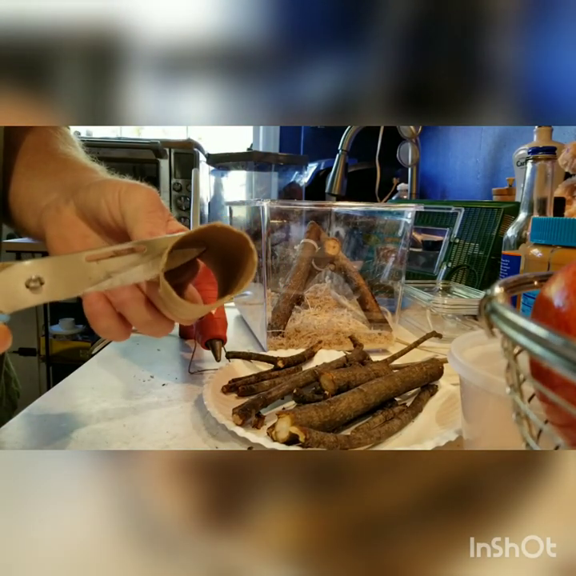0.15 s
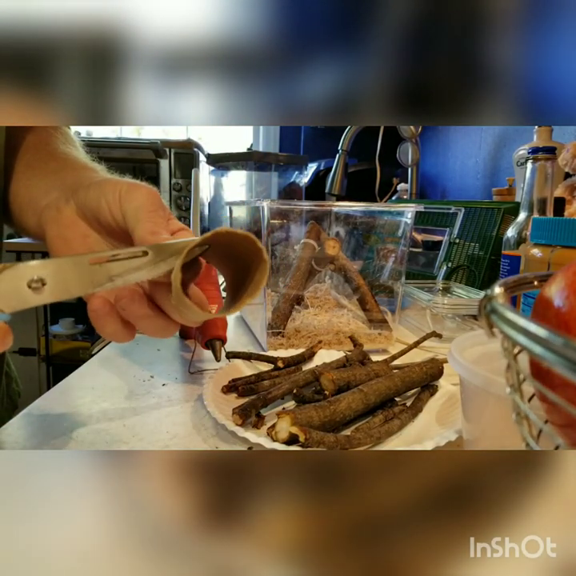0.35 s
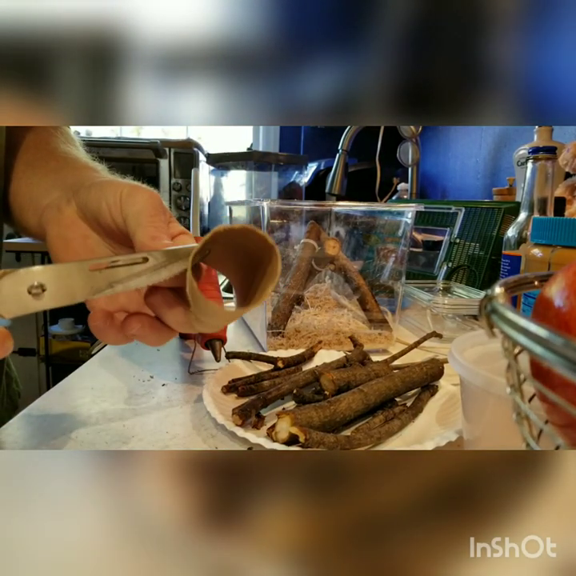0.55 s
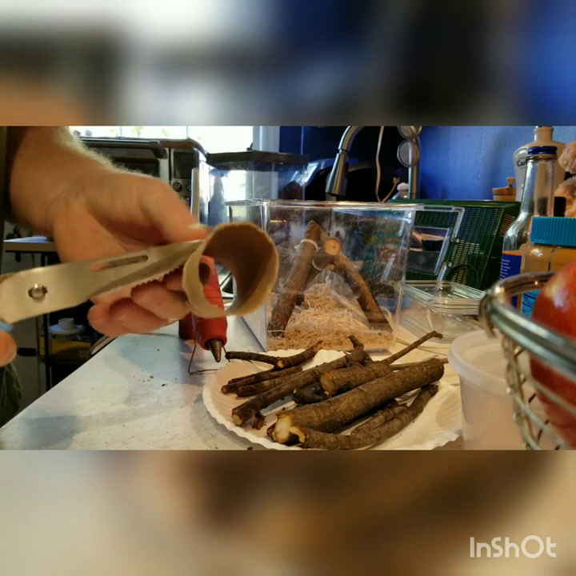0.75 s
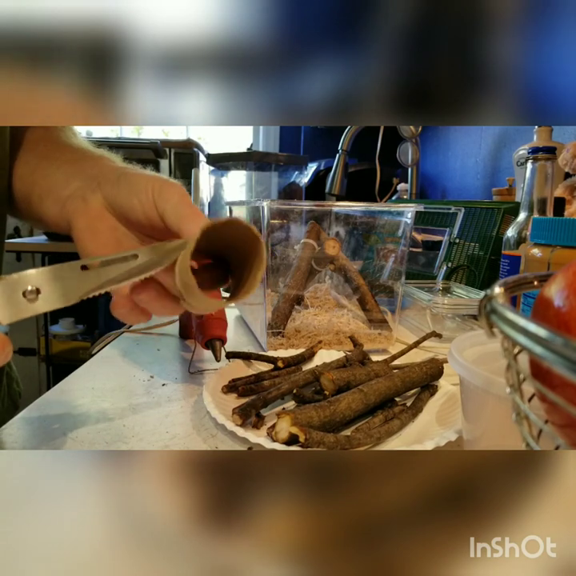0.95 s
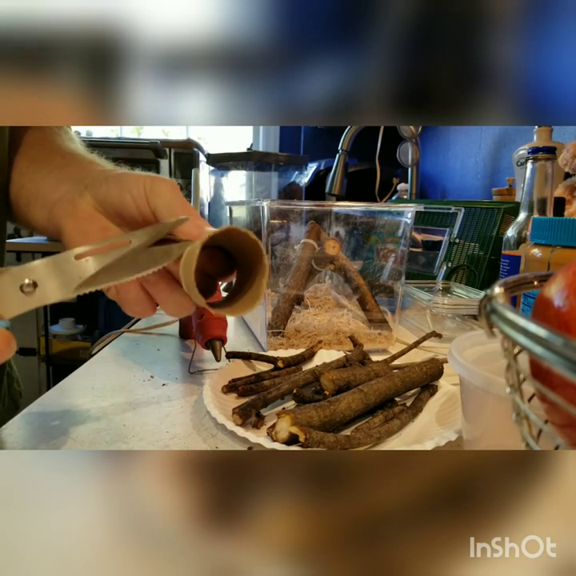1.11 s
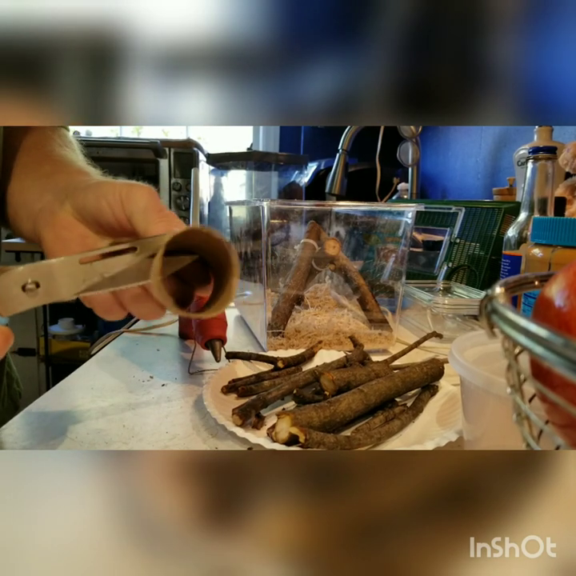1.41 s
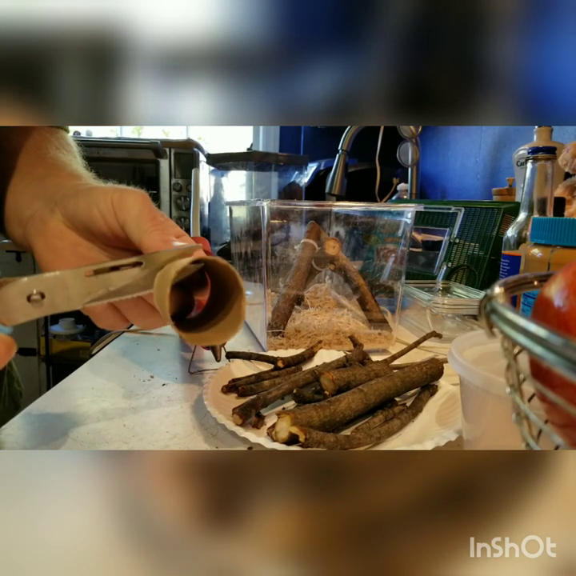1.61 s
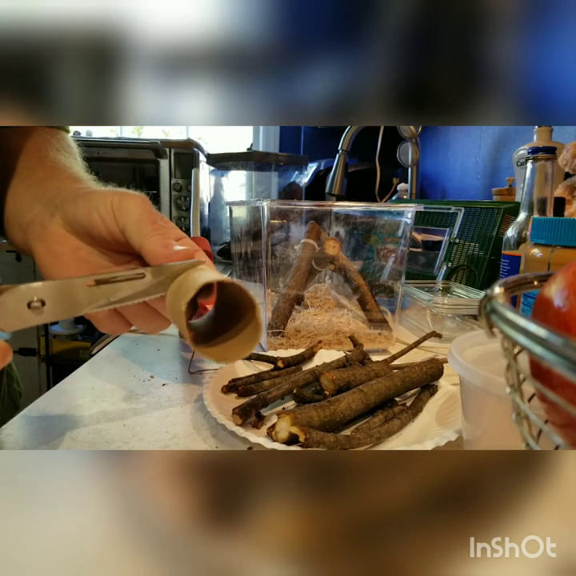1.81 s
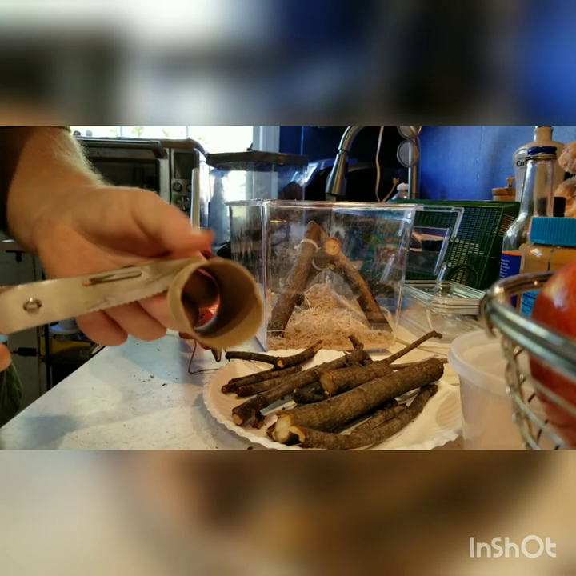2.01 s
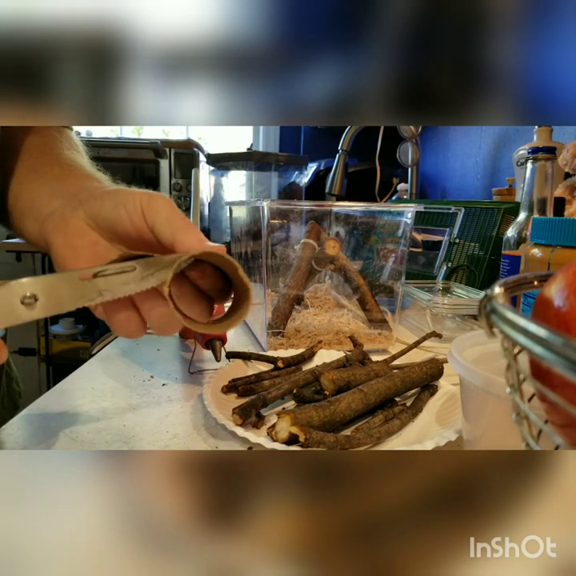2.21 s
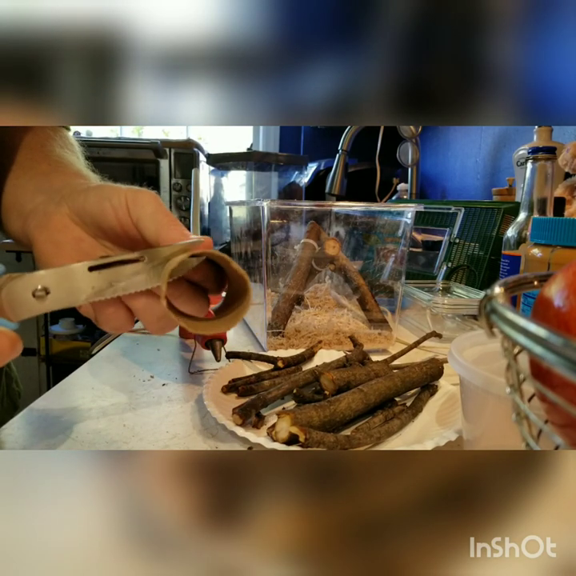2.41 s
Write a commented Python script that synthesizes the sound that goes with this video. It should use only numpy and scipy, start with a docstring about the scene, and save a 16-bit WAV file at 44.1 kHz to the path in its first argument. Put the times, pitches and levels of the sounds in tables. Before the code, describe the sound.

Close scissors cutting a cardboard tube in crisp uneven crunches, with papery scraping and hollow knocks.

```python
"""Kitchen counter: scissors nibble at a short cardboard tube close to two microphones.
Blades and fingers rub the card in strokes of dense fibre grains; fibres give way in short snaps.
Both ring the blades, the tube wall, the air in the tube and its overtones, and the hissing fibres.
Jolts of the hands thud through the counter, and a quiet room hums underneath.
Short random reflections, partly different at the two microphones, spread the scissors' sound."""
import sys
import numpy as np
from scipy import signal
from scipy.fft import rfft, irfft, next_fast_len
from scipy.io import wavfile
from scipy.ndimage import map_coordinates

SR = 44100
rng = np.random.default_rng(int(sys.argv[2]) if len(sys.argv) > 2 else 0)


def put_to_file(sound):
    """Save the sound as 16-bit audio at rate SR, in the file named by the first command-line argument."""
    columns = np.atleast_2d(sound).T  # one column per channel
    safe = np.clip(columns, -1, 1)
    whole_steps = np.round(safe * 32767)
    wavfile.write(sys.argv[1], SR, whole_steps.astype(np.int16))


N = 112454  # samples
CREST_S = 0.0012  # a snap crests this long after its onset


def scissors():
    """Strokes and snaps ring every body; random reflections to the microphones, redrawn and cross-faded."""
    # resonances of each body: f/Hz, width/Hz, level/dB relative within the body
    blade_modes = [(4544, 1270, -6.5), (5540, 535, 1), (6186, 430, -1), (6975, 590, 2), (7600, 760, -0.5)]
    wall_modes = [(339, 48, 0), (492, 47.4, 3.5), (633, 160, -4)]
    wall_high_modes = [(795, 106, -2.5), (984, 105, -1), (1154, 86, -2)]
    air_modes = [(1328, 96, -2.5), (1564, 56, 6), (1750, 92, 2.5), (2110, 430, -3.5)]
    overtone_modes = [(2417, 340, -10.5), (2724, 330, -1.5), (2880, 114, 2)]  # narrow and lower, near 2.7 kHz
    overtone_broad_modes = [(2385, 500, -16), (2994, 500, -1.5), (3490, 510, 1.5), (3984, 800, -1.5)]  # broad and higher
    fibre_modes = [(9650, 1900, -4), (11990, 2340, -0.5), (15150, 2100, 0)]
    # share of the wall's force that drives its higher modes: t/s, share/0-1
    wall_shift = [(0, 0.6), (.25, 0.65), (.33, 0.2), (.45, 0.6), (.6, 0.12), (.66, 1), (.8, 0.47),
                  (.95, 0.08), (1.37, 0.59), (1.46, 0.5), (1.78, 0.7), (1.82, .25), (2.1, 0.6), (2.3, 0.94),
                  (2.55, 0.18)]
    # share of the overtone's force that drives the narrow set: t/s, share/0-1
    narrow_share = [(0, 1), (.245, .95), (.27, 0.56), (.7, 0.38), (1, 0.43), (1.3, 0.6), (1.4, 0.23),
                    (1.75, 0.68), (1.8, 1), (1.82, 0.3), (2, 0.04), (2.55, 0.35)]
    # colour of the reflections that differ between the microphones: f/Hz, gain/dB
    apart_colour = [(60, -10), (110, -8), (200, -7), (380, -5.5), (700, -2.5), (1290, 1.5), (2380, -1.5),
                    (4400, 1), (8120, 1.5), (15000, -0.5)]
    redraw_s = 0.07  # time between fresh draws of the reflections

    blades, wall, air, overtone, fibres = rubbing() + snaps()
    wall_high, wall_low = wall * shares(wall_shift)
    overtone_narrow, overtone_broad = overtone * shares(narrow_share)
    driven = [(blades, blade_modes), (wall_high, wall_high_modes), (wall_low, wall_modes),
              (air, air_modes), (overtone_narrow, overtone_modes),
              (overtone_broad, overtone_broad_modes), (fibres, fibre_modes)]
    rung = sum(filtered(force, body(modes)) for force, modes in driven)

    # cross-fade from one draw to the next, which averages out their colouring
    draw_clock = np.arange(N) / SR / redraw_s
    common, apart = 0, 0
    for k in range(int(draw_clock[-1]) + 2):
        near_draw = np.clip(1 - np.abs(draw_clock - k), 0, 1)
        common_part, apart_part = paths(rung * near_draw)
        common = common + common_part
        apart = apart + apart_part
    apart = filtered(apart, lambda hz: amp(along(apart_colour, hz)))
    return np.array([common + apart, common - apart]) + thuds()


def rubbing():
    """Friction of blade or finger on card: fibre grains that fade in, follow each stroke and fade out."""
    # strokes along the card, one list each: t/s, then force level/dB on
    # blades, tube wall, tube air, tube overtone, fibre hiss
    strokes = [
        [(0.055, -69, -95, -99, -93, -73), (0.095, -68, -97, -99, -74, -68), (0.135, -65, -96, -91, -73, -69),
         (0.145, -70, -95, -95, -81, -74)],
        [(0.15, -60, -91, -88, -65, -61), (0.17, -61, -85, -99, -59, -57), (0.188, -51, -90, -78, -59, -54),
         (0.205, -64, -94, -88, -72, -62)],
        [(0.255, -50, -53, -53, -52, -42), (0.275, -55, -61, -64, -62, -53), (0.297, -41, -60, -53, -41, -36),
         (0.335, -51, -75, -60, -65, -52)],
        [(0.34, -57, -61, -62, -66, -55), (0.382, -41, -63, -48, -50, -45), (0.408, -51.5, -62, -63, -57, -52),
         (0.42, -53, -63, -62, -62, -55)],
        [(0.435, -65, -70, -52, -59, -55), (0.449, -56, -60, -52, -54, -47),
         (0.507, -61.5, -74, -75.5, -80, -58), (0.53, -60, -84, -75, -72, -55)],
        [(0.535, -57, -82, -76, -82, -54), (0.539, -50.5, -85, -75, -76, -54),
         (0.591, -46, -81, -46, -63, -43.5), (0.6, -52, -71, -52, -56, -56)],
        [(0.605, -49, -56, -60, -53, -43), (0.615, -43, -41, -43, -44, -43),
         (0.637, -35.5, -44, -37, -43, -36.5), (0.645, -33.5, -62, -37, -34.5, -34.5)],
        [(0.67, -41, -51, -42, -41, -45), (0.692, -49, -58, -52.5, -48, -51), (0.712, -45, -52, -47, -49, -48),
         (0.725, -52, -72, -67, -50.5, -51)],
        [(0.735, -50, -68, -56.5, -58, -53), (0.773, -53, -77, -64, -59, -53), (0.795, -64, -89, -83, -67, -63),
         (0.815, -63, -85, -78, -77, -58)],
        [(0.82, -58, -83, -73, -86, -57), (0.838, -51.5, -95, -66, -65, -46),
         (0.854, -56.5, -95, -59.5, -63, -51), (0.88, -51, -67, -71, -47, -48)],
        [(0.92, -68, -54, -55, -73, -71), (0.95, -54, -69, -70, -60, -56), (1.006, -50, -81, -58, -53, -52.5),
         (1.04, -59, -94, -66, -59.5, -60)],
        [(1.05, -65, -87, -78, -76, -61), (1.068, -59, -91, -57, -61, -59), (1.076, -62, -90, -60, -63, -61),
         (1.11, -59.5, -76, -77, -68, -58)],
        [(1.14, -53, -61.5, -56.5, -57.5, -63), (1.216, -56, -81, -72, -64, -53),
         (1.242, -51, -73, -64, -56, -52), (1.28, -63, -86, -67, -65, -61)],
        [(1.295, -52, -86, -65, -59, -50), (1.325, -58, -98, -76, -63, -56), (1.347, -47, -52, -53, -52, -47),
         (1.36, -56.5, -66, -62, -60, -56)],
        [(1.378, -42.5, -41.5, -41.5, -44, -43), (1.44, -47.5, -67.5, -46.5, -50, -48),
         (1.458, -56.5, -54, -64, -50, -53), (1.472, -55.5, -66, -55, -55, -55)],
        [(1.48, -58.5, -63.5, -58, -58, -60), (1.606, -62.5, -82, -76, -68.5, -65),
         (1.642, -64, -97, -80, -71, -57.5), (1.69, -75.5, -86, -99, -87, -75)],
        [(1.79, -45, -58, -56, -55, -44), (1.804, -49, -67, -58, -51, -46), (1.808, -39, -48, -53, -54, -41)],
        [(1.835, -44, -47.5, -46, -39.5, -40), (1.883, -57, -75, -75, -67, -67),
         (1.905, -63, -72, -70, -65, -78), (1.915, -57, -61.5, -54, -65, -54)],
        [(1.94, -55, -65, -58, -56, -61), (1.97, -61, -79, -71, -64.5, -54.5),
         (2.064, -51, -74, -60, -51.5, -51), (2.11, -52.5, -70, -64, -56.5, -59)],
        [(2.122, -44, -53.5, -62, -49, -44), (2.166, -42, -69, -50.5, -45, -42.5),
         (2.202, -55.5, -79, -66, -57, -55), (2.25, -52, -85, -69, -56, -52)],
        [(2.264, -44, -65, -46, -42.5, -44), (2.314, -39, -45, -44, -39.5, -39),
         (2.342, -45, -55.5, -43.5, -45, -46.5), (2.385, -54, -65, -61.5, -54, -50.5)],
        [(2.4, -50, -68.5, -55, -51.5, -50.5), (2.454, -48.5, -51.5, -48, -48.5, -47.5),
         (2.49, -54.5, -65, -55.5, -54, -60), (2.53, -64, -77, -74, -76, -66)],
    ]
    rise_s, fall_s = 0.0065, 0.01
    rub_db, flutter_depth_db = -0.19, 0.91  # trim; unevenness of the rubbing
    t, power = np.arange(N) / SR, np.zeros((5, N))
    for stroke in strokes:
        times, *levels = np.transpose(stroke)
        before = np.minimum(t - times[0], 0) / rise_s
        after = np.maximum(t - times[-1], 0) / fall_s
        edges = np.exp(-before ** 2 - after ** 2)
        force = edges * amp([np.interp(t, times, db) for db in levels])
        power += force ** 2
    # one flutter shared by all bodies, one for each alone
    flutter = wobble(60) + np.array([wobble(40) for _ in power])
    return grains(0.5) * amp(rub_db + flutter_depth_db * flutter) * np.sqrt(power)


def snaps():
    """Breaking fibres push each body: crunches burst with grains, ticks start with one sharp slip."""
    # bursts of tearing fibres: t/s, level/dB before trim, then over it level/dB on
    # blades, tube wall, tube air, tube overtone, fibre hiss; rise/s, t60/s
    crunches = [(0.217, -24, -10.5, -54, -38, -12.5, -16, 0.0016, 0.025),
                (0.237, -15.5, -11, -33, -24, -15, -12.5, 0.0043, 0.042),
                (0.296, -20.5, -14, -39, -18.5, -26, -12.5, 0.0096, 0.057),
                (0.368, -28.5, -12.5, -61, -25, -26, -8.5, 0.003, 0.05),
                (0.382, -23, -11.5, -46, -41, -19, -14, 0.0021, 0.021),
                (0.427, -29, -10, -32, -25, -23, -8, 0.0026, 0.057),
                (0.584, -32, -8.5, -29, -7, -28, -8, 0.0022, 0.097),
                (0.612, -28.5, -15, -14, -6, -20, -11, 0.0042, 0.083),
                (0.651, -9.5, -13.5, -14.5, -12, -14.5, -17, 0.0057, 0.039),
                (0.706, -33, -17, -26, -27, -16, -17, 0.00354, 0.043),
                (0.888, -24.5, -10.5, -26, -19, -13.5, -11, 0.0049, 0.055),
                (0.905, -27.5, -17, -20.5, -16.5, -25, -14, 0.0035, 0.056),
                (1.117, -21, -16.5, -36, -21, -17.5, -14, 0.0027, 0.056),
                (1.287, -32, -13.5, -47, -28, -18, -13, 0.0035, 0.036),
                (1.343, -37, -4, -7, -10, -6, -11, 0.0013, 0.017),
                (1.456, -28, -16, -19.5, -11.5, -16.5, -16, 0.0029, 0.043),
                (1.778, -19.5, -9, -24, -23, -10.5, -8.5, 0.0043, 0.035),
                (1.814, -11, -10.5, -19, -19.5, -15.5, -12.5, 0.0023, 0.055),
                (1.923, -21.5, -10.5, -25.5, -21.5, -19, -13.5, 0.0024, 0.051)]
    # single slips: t/s, level/dB before trim, then over it level/dB on the same five bodies
    ticks = [(0.055, -50.5, -9.5, -28, -27, -26.5, -10.5), (0.077, -53, -7, -38, -38, -24, -10.5),
             (0.089, -52, 2, -37, -47, -18, -14), (0.097, -39, -12, -39, -44, -24, -17),
             (0.11, -47.5, -9, -46, -37, -21, -16), (0.127, -41.5, -8, -47, -46, -21, -14),
             (0.465, -33.5, -17, -25, -23, -28, -8), (0.542, -39, -9, -34, -28, -26, -4.5),
             (0.562, -31.5, -17, -41, -23, -22, -11), (0.816, -42, -14, -53, -31, -28, -6),
             (1.033, -43.5, -12, -48, -18, -21, -13), (1.061, -43, -35, -36, -20, -26, -6.5),
             (1.224, -29.5, -14, -46, -27, -22, -11.5), (1.306, -39, -12, -37, -25, -17, -12),
             (1.371, -15, -21, -18, -17, -15.5, -23.5), (1.635, -35.5, -9.5, -45, -41, -27, -14.5),
             (1.645, -37.5, -14, -46, -34, -23, -14), (1.657, -47, -14, -32, -34, -28, -10),
             (1.768, -40, -21, -26, -35, -38, -13), (1.974, -32.5, -11, -39, -33, -24, -15.5),
             (2.0, -34, -15, -35, -38, -24, -17), (2.015, -33.5, -18, -43, -29, -18.5, -13),
             (2.161, -29, -18, -48, -26, -21, -17), (2.21, -49, -25, -39, -26, -22, -15),
             (2.227, -51, -13, -34, -13.5, -12, -10.5), (2.369, -26.5, -19, -33, -25, -18, -15.5),
             (2.374, -32.5, -7.5, -35, -33, -22, -17), (2.394, -33.5, -19, -34, -26, -14.5, -14),
             (2.493, -32, -16, -23, -22, -18, -22)]
    crunch_trim_db, tick_trim_db = -2, 2.5
    tick_rise_s, tick_t60_s = 0.00048, 0.011
    first_slip_db = 11.5  # over the noise that follows

    crunch, tick = np.zeros((2, 5, N))
    for onset, db, *over, rise_s, t60_s in crunches:
        force = amp(crunch_trim_db + db + np.array(over))
        crunch += force[:, None] * burst(onset, rise_s, t60_s)
    slips = rng.standard_normal(N)
    for onset, db, *over in ticks:
        force = amp(tick_trim_db + db + np.array(over))
        tick += force[:, None] * burst(onset, tick_rise_s, tick_t60_s)
        slips[round((onset + CREST_S) * SR)] = amp(first_slip_db)
    return crunch * grains(1.5) + tick * slips


def grains(spread_db):
    """Tiny fibre slips at random moments over a noise bed, a few much larger than the rest; rms 1."""
    grains_per_s = 6000
    chance, size, sign = rng.random(N), rng.exponential(1, N), rng.standard_normal(N)
    slips = (chance < grains_per_s / SR) * amp(spread_db * np.minimum(size, 4)) * sign
    return unit(slips + 0.24 * sign)


def burst(onset, rise_s, t60_s):
    """Force envelope of a snap: a quick swell to the crest and an exponential fall."""
    age = np.arange(N) / SR - onset - CREST_S
    return np.where(age < 0, np.exp(-(age / rise_s) ** 2), amp(-60 * np.abs(age) / t60_s))


def body(modes):
    """Causal response of a set of resonances, steep outside them, power gain 1."""
    def response(f):
        low = f / (0.85 * modes[0][0])
        high = f / (1.15 * modes[-1][0])
        high_pass = 1j * low ** 2 / (1 - low ** 2 + 1j * low)
        low_pass = 1 / (1 - high ** 2 + 1j * high)
        rings = 0
        for k, (centre, width, db) in enumerate(modes):
            ring = 1j * f * width / (centre ** 2 - f ** 2 + 1j * f * width)
            rings = rings + (-1) ** k * amp(db) * ring  # neighbours alternate in sign
        return unit((high_pass * low_pass) ** 2 * rings)
    return response


def shares(curve):
    """Two gains that cross-fade with equal power."""
    share = np.clip(np.interp(np.arange(N) / SR, *np.transpose(curve)), 0, 1)
    return np.sqrt([share, 1 - share])


def paths(x):
    """Direct sound with common random reflections, and differing reflections; both get a tail."""
    common_t60_s, apart_t60_s, tail_t60_s = 0.0064, 0.02, 0.2
    near_db, tail_db = -4, -9  # common reflections over the direct sound; tail, before normalising
    t = np.arange(SR // 3) / SR
    near = rng.standard_normal((2, len(t))) * amp(-60 * t / np.array([[common_t60_s], [apart_t60_s]]))
    near = near / np.linalg.norm(near, axis=1, keepdims=True)
    tail = rng.standard_normal((2, len(t))) * amp(-60 * t / tail_t60_s)
    direct = t == 0
    answer = np.array([direct + amp(near_db) * near[0], near[1]])
    answer = answer + amp(tail_db) * tail / np.linalg.norm(tail[0])
    answer = answer / np.linalg.norm(answer, axis=1, keepdims=True)
    return signal.fftconvolve(x[None], answer, axes=1)[:, :N]


def thuds():
    """Each jolt of the hands pushes a short low wave, a decaying sine, through the counter."""
    # hand jolts: t/s, level/dB
    jolts = [(0.236, -45.5), (0.649, -39.5), (0.896, -43), (1.117, -62), (1.342, -56), (1.37, -43.5),
             (1.457, -40), (1.814, -54), (2.447, -47)]
    centre_hz, t60_s = 148, 0.074  # each jolt draws its pitch around the centre
    t, wave = np.arange(N) / SR, np.zeros(N)
    for onset, db in jolts:
        age = np.maximum(t - onset, 0)
        hz = centre_hz * rng.uniform(0.77, 1.4)
        wave += amp(db - 60 * age / t60_s) * np.sin(2 * np.pi * hz * age)
    return wave


def room():
    """The kitchen's low hum and faint hiss: coloured noise, more alike left and right in the lows."""
    # colour of the room: f/Hz, relative level/dB per Hz
    colour = [(15, -46), (25, -15.5), (60, -8), (85, 3), (105, -3), (150, -2.5), (200, -6), (360, -19.5),
              (560, -26.5), (900, -31.5), (2000, -31.5), (3800, -29), (4700, -34), (7000, -24), (8500, -36),
              (11800, -28), (15900, -38.5)]
    # left-right likeness: f/Hz, likeness/0-1
    likeness = [(30, 0.87), (80, 0.96), (250, 0.59), (1000, .3), (4000, .1)]
    # swell of the room: t/s, level/dB
    swell = [(0.0, -66.5), (0.55, -61), (0.92, -64), (1.36, -59.5), (1.65, -64), (1.73, -62), (1.92, -60),
             (2.55, -61)]
    pair = filtered(rng.standard_normal((2, N)), lambda hz: amp(along(colour, hz)))
    level_db = np.interp(np.arange(N) / SR, *np.transpose(swell))
    return amp(level_db) * unit(blend(pair, likeness))


def blend(pair, alike):
    """Two unrelated signals mixed to left and right of a given likeness."""
    def mid_side_gains(hz):
        turn = np.arccos(np.clip(along(alike, hz), -1, 1)) / 2
        return np.array([np.cos(turn), np.sin(turn)])
    mid, side = filtered(pair, mid_side_gains)
    return np.array([mid + side, mid - side])


def wobble(rate):
    """A smooth random curve, rate knots a second."""
    knots = rng.standard_normal(int(N * rate / SR) + 4)
    return map_coordinates(knots, [np.arange(N) * rate / SR])


def filtered(x, response):
    """Shapes the spectrum of x by a complex response of frequency."""
    m = next_fast_len(N + SR // 2)  # space for the ringing
    return irfft(rfft(x, m) * response(np.fft.rfftfreq(m, 1 / SR)), m)[..., :N]


def along(points, hz):
    """Reads a curve of (Hz, value) points on a log frequency axis."""
    f, v = np.transpose(points)
    return np.interp(np.log(hz + 1), np.log(f + 1), v)


def amp(db):
    """Amplitude gain of a level in dB."""
    return 10 ** (np.asarray(db) / 20)


def unit(x):
    """Scales x to rms 1."""
    return x / np.sqrt(np.mean(np.abs(x) ** 2) + 1e-20)


def scene():
    """Scissors at work over the room."""
    return scissors() + room()


def record(dry):
    """The two microphones differ in colour; nothing passes above the band limit."""
    # balance of the microphones: f/Hz, left over right/dB
    balance = [(60, -2.5), (110, -2.0), (200, -3), (380, -2), (700, -6), (1290, -2), (2380, -2.5),
               (4400, -1), (8120, -1.5), (15000, 3)]
    top_hz = 15870

    def colour(hz):
        halves = np.array([[0.5], [-0.5]])  # half the difference to each side
        return amp(along(balance, hz) * halves) * (hz < top_hz)
    return filtered(dry, colour)


dry = scene()
out = record(dry)
put_to_file(out)
```